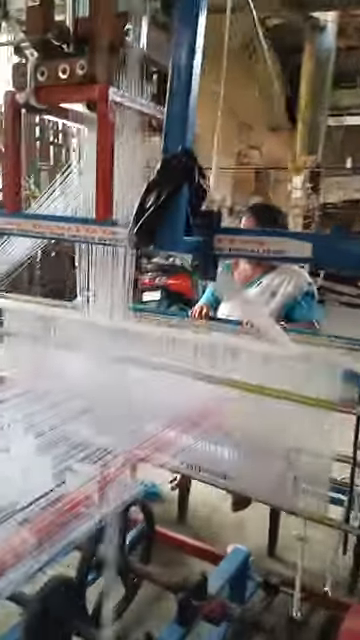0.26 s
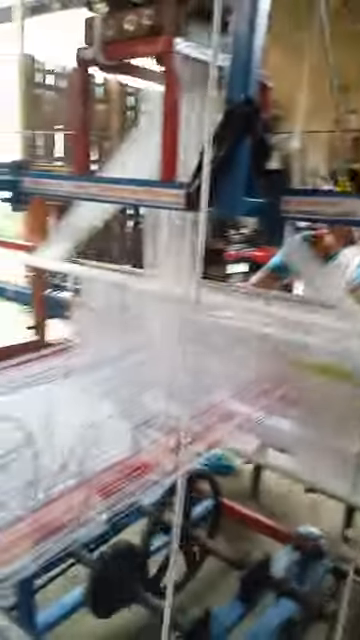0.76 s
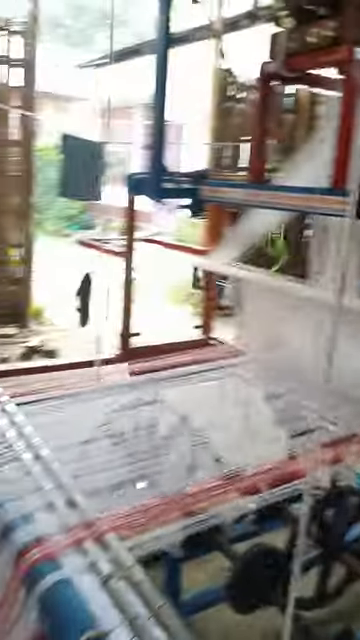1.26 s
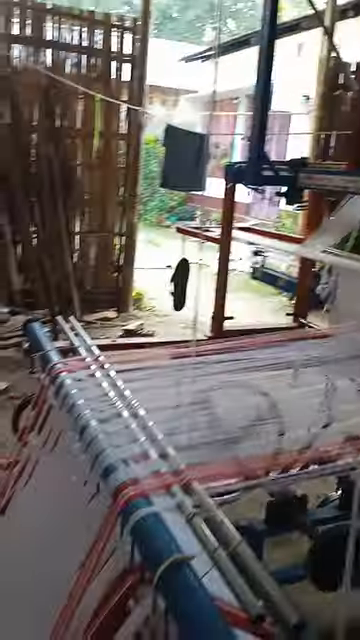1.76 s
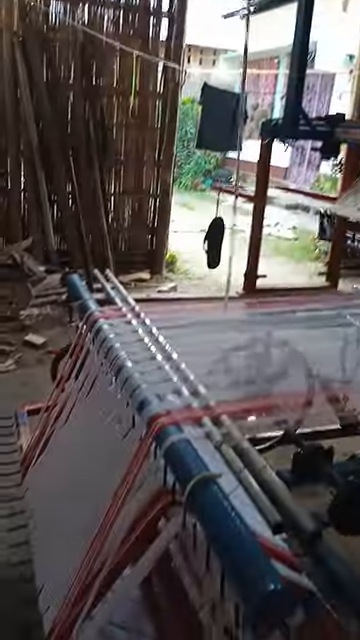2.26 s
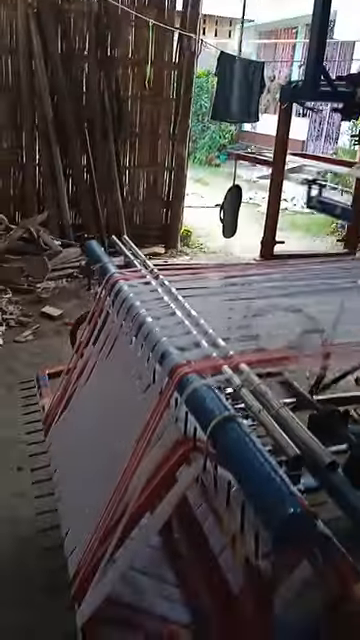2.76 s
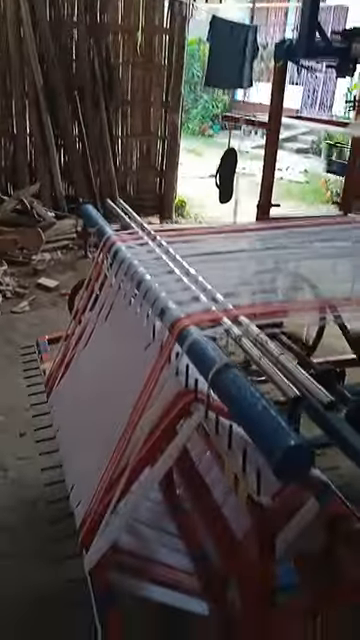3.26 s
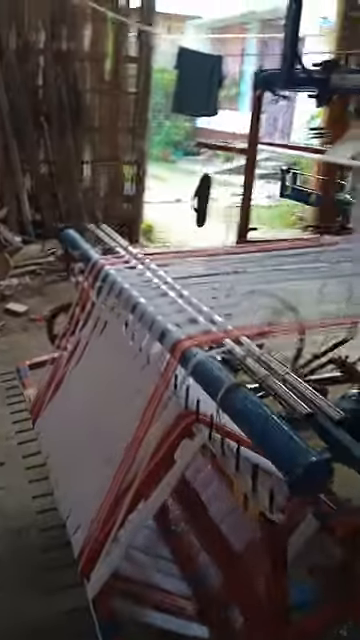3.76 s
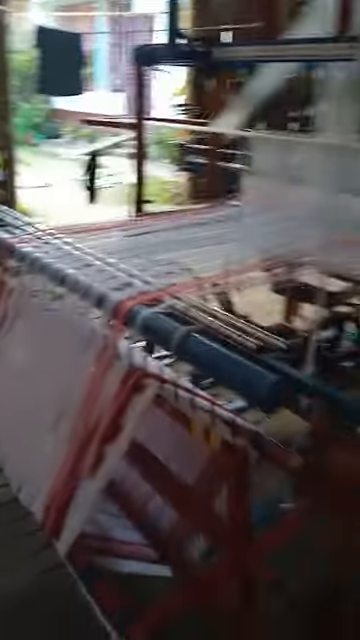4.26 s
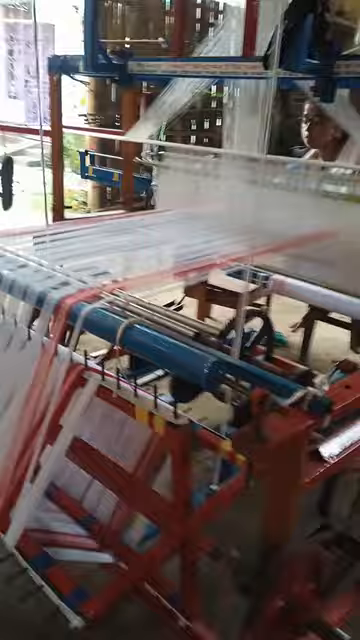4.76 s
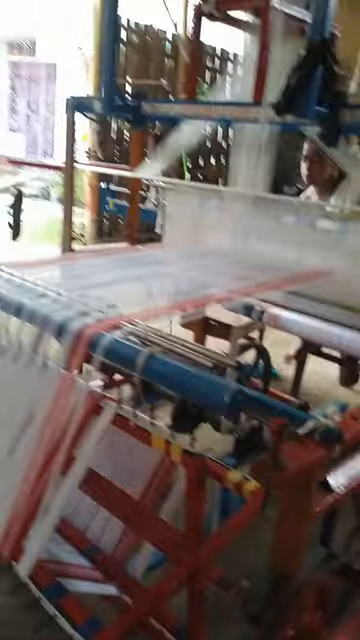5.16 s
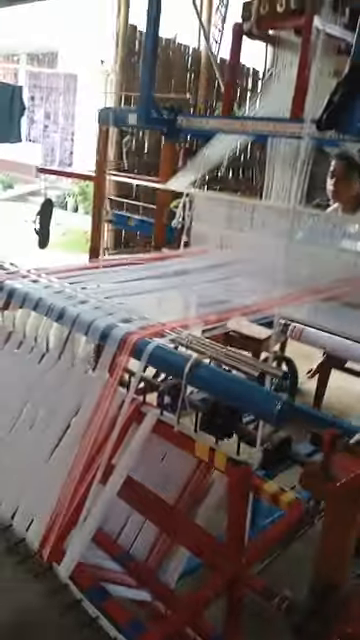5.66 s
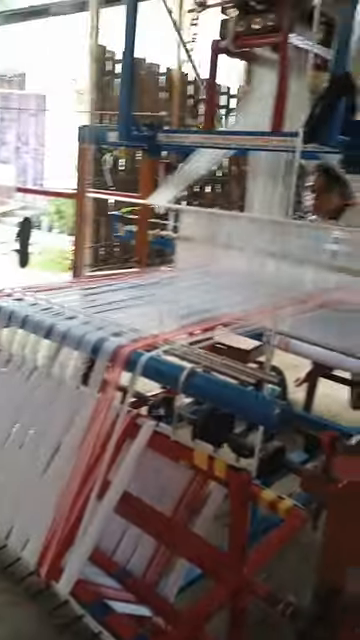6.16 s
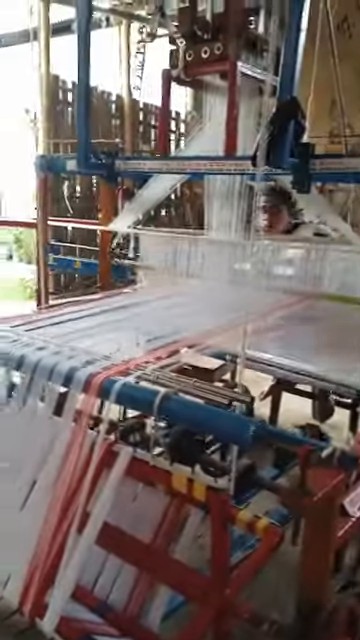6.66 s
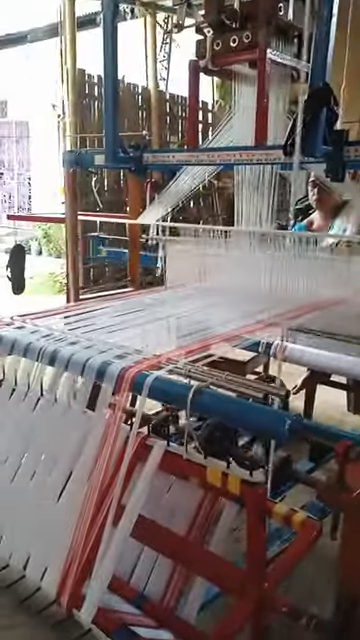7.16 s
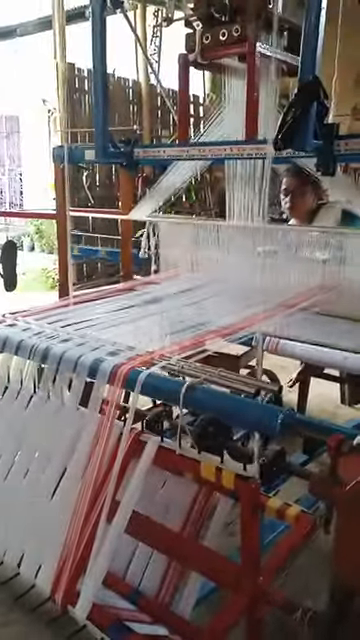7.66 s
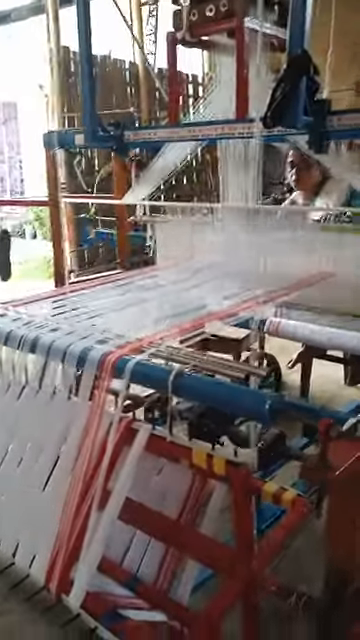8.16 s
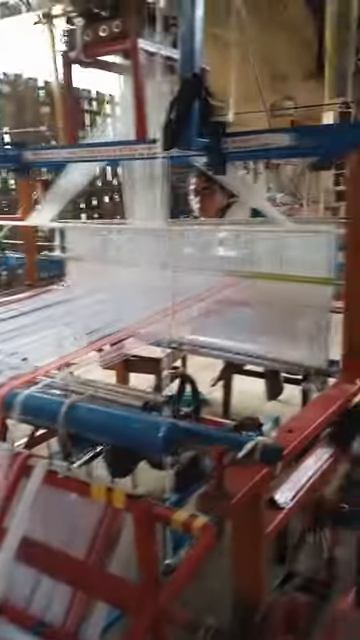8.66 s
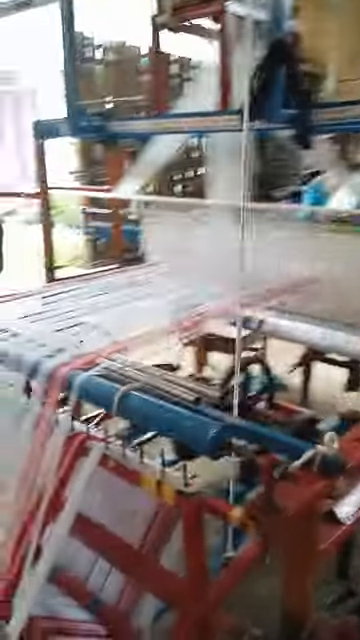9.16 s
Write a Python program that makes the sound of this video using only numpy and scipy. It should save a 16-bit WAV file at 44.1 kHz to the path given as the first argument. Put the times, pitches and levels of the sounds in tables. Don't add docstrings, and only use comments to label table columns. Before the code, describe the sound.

A steady, roughly one-second weaving cycle of bright metallic clatter, wooden knocks and jingling hooks, with blurred looms farther off.

```python
import sys
import numpy as np
from scipy import signal
from scipy.fft import rfft, irfft
from scipy.io import wavfile
from scipy.ndimage import uniform_filter1d, map_coordinates

SR = 44100
rng = np.random.default_rng(int(sys.argv[2]) if len(sys.argv) > 2 else 0)


def wrap_up_sound(samples):
    columns = np.atleast_2d(samples).T
    tamed = np.clip(columns, -1, 1)
    steps = np.round(tamed * 32767).astype(np.int16)
    wavfile.write(sys.argv[1], SR, steps)


def how_loud(loudness_db):
    steps = np.asarray(loudness_db, float) / 20
    return 10 ** steps


N = 414981

# frequency in Hz, level in dB per Hz.
WOOD = [(40, -70), (142, -36.5), (492, -12), (600, -13.5), (890, -10), (1370, -8.5), (1520, -8), (2300, -4),
        (3350, -13), (4500, -14), (5850, -31), (9900, -120)]
# frequency in Hz, level in dB per Hz.
STEEL = [(1760, -54), (3000, -5.5), (3370, -13), (4180, -8.5), (6400, 3.5), (7080, 1.5), (8300, -17),
         (9500, -25), (12400, -33), (20900, -120)]
# frequency in Hz, level in dB per Hz.
REED = [(5000, -28), (7800, 0), (9900, 0), (11500, -6), (12400, -6), (13600, -11), (14400, -13),
        (16000, -12)]
# start in seconds, end in seconds, jangle in dB.
LIFTS = [(0.26, 0.617, -14.5), (1.22, 1.583, -9.5), (2.208, 2.53, -11.5), (3.085, 3.523, -8),
         (4.126, 4.483, -13), (5.072, 5.517, -6), (6.15, 6.613, -9), (7.08, 7.297, -17),
         (7.422, 7.815, -5.5), (8.389, 8.83, -8)]
# start in seconds, steel peak in dB, wood share in dB.
PULLS = [(.387, -17.5, -3), (1.2288, -18.5, -18), (2.2435, -23.5, -13), (2.2857, -13.5, -9.5),
         (3.1666, -19.5, -10.5), (3.2, -18, -28), (4.202, -18.5, -8), (5.117, -20, -18), (6.225, -26, -2),
         (7.411, -24.5, -7.5), (8.468, -23, -5)]
# start in seconds, steel peak in dB, wood share in dB, length over the usual.
FALLS = [(.456, -11, -9.5, 1.06), (1.3886, -9.5, -13, 1.7), (2.386, -10, -14, 0.75),
         (2.4458, -10.5, -30, 0.74), (3.311, -9.5, -14, 1.3), (4.3405, -14, -13, 1.2),
         (5.2929, -10, -14, 1.1), (6.3895, -15, -9, 1.14), (7.5986, -13.5, -13, 0.78),
         (7.765, -20, -4.5, 0.49), (8.6343, -12, -9, 0.95)]
# start in seconds, steel peak in dB, wood share in dB.
BEATS = [(.6547, -9, -15), (1.641, -6.5, -24), (2.579, -8.5, -14.5), (2.62, -17, -15.5), (3.5683, -8, -32),
         (4.5154, -8.5, -21.5), (5.5724, -12, -23), (6.6563, -18, -10), (6.689, -17.5, -6.5),
         (7.834, -9, -19), (8.867, -11, -16)]
# start in seconds, steel peak in dB, wood share in dB, length over the usual.
THROWS = [(0, -18, -12.5, 1.2), (.0172, -12.5, -18.5, 0.76), (.9003, -10, -25, 0.91),
          (1.897, -25.5, -6.5, 1.2), (1.9108, -14, -20, 0.77), (2.828, -11.5, -18, 0.77),
          (3.819, -16.5, -17, 1), (3.833, -15, -25, 0.98), (4.735, -21.5, -5.5, 0.73),
          (4.7527, -9, -18.5, 0.92), (5.867, -19, -12.5, 1.65), (5.9998, -17.5, -10.5, 0.81),
          (8.0183, -18, -7, 0.66), (8.1094, -23.5, -8.5, 1.56), (9.116, -14, -23, 0.54)]
# start in seconds, steel peak in dB, wood share in dB.
STOPS = [(.1483, -10.5, -14), (1.0432, -13.5, -14), (2.041, -9, -13), (2.973, -14.5, -21),
         (3.9634, -10, -14.5), (4.8823, -15.5, -15.5), (6.0372, -16, -12), (8.248, -14, -8),
         (9.2575, -22, -12.5)]
# start in seconds, steel peak in dB, wood share in dB.
KNOCKS = [(.772, -29.5, 0.5), (1.3494, -18, -1), (2.696, -21.5, -4), (3.255, -29, -7), (3.6855, -29, -1.5),
          (4.3161, -16.5, -8.5), (4.6328, -27.5, -1.5), (5.229, -23, -3.5), (5.693, -27.5, 0.5),
          (6.273, -28.5, 4.5), (6.7695, -33.5, 5.5), (7.223, -42, 0), (7.528, -29, 3.5), (7.9594, -35, -2),
          (8.1977, -28, -7), (8.578, -21, -0.5), (8.7426, -11, -10), (8.9738, -13.5, -9)]
# start in seconds, steel peak in dB, wood share in dB.
TICKS = [(.0747, -20, -9.5), (.8335, -25, -8.5), (1.9719, -18.5, -18.5), (2.0118, -18.5, -17),
         (2.2144, -26, -52), (2.9457, -25, -5), (3.1043, -23, -40), (3.311, -14.5, -10),
         (1.9118, -16, -13.5), (1.228, -20, -7.5), (.147, -14.5, -12), (9.1177, -16.5, -22),
         (5.5724, -18, -12.5), (3.8197, -22, -15), (3.895, -19, -16), (4.715, -28, -6), (5.04, -32, -18),
         (.886, -26, -22), (2.812, -22.5, -17), (5.062, -33.5, 1.5), (4.163, -28, -26), (8.4807, -23, -9),
         (5.089, -25, -11), (5.9304, -21, -10.5), (7.0189, -25, -18), (7.2944, -30.5, -11),
         (7.3444, -35, -6), (8.405, -26, -9), (9.3935, -32, -35)]
# start in seconds, steel peak in dB, wood
# share in dB.
RATTLES = [(.185, -21, -8), (.366, -36, 0), (.572, -18.5, -16), (.695, -20, -7), (1.054, -14, -19),
           (1.263, -18, -22), (1.403, -14, -15), (2.082, -12.5, -8.5), (3.272, -30, 4), (2.735, -25, -25),
           (8.31, -22, -7), (2.962, -19, -25), (3.44, -11.5, -17), (3.562, -25, -14), (3.848, -20, -16),
           (4.015, -16.5, -10), (4.252, -14.5, -15), (4.905, -13, -23), (5.288, -17, -7), (5.388, -16, -16),
           (5.418, -18, -23), (5.703, -25.5, -2.5), (5.765, -29.5, -20), (6.41, -22, -2), (6.4, -19, -20),
           (7.518, -24, -26), (7.548, -30, 4), (7.69, -14.5, -11), (8.036, -26, -18), (8.246, -20, -16),
           (8.415, -36, -23), (8.556, -23, -12), (8.645, -14.5, -7), (8.705, -16, -11), (9.105, -28, -15)]
# its blows, reed share in dB, shower decay (t60) in seconds,
# after-shake of the hooks in dB, after-shake of the frame in dB, first crack in dB.
BLOWS = [
    (PULLS, -19.5, 0.45, -19.5, -15, -1.5),
    (FALLS, -19.5, 0.47, -38, -43, -2.5),
    (BEATS, -19.5, 0.25, -19, -23.5, -2.4),
    (THROWS, -22, 0.31, -21.5, -23, -2.3),
    (STOPS, -19.5, 0.3, -24, -25, -1.8),
    (KNOCKS, -40.5, 0.16, -26, -21, -7),
    (TICKS, -25, 0.3, -30, -24.5, -0.96),
    (RATTLES, -21.5, 0.18, -24, -43, -10),
]


def unit(x):
    return x / np.sqrt(np.mean(x ** 2) + 1e-20)


def along(points, hz):
    f, v = np.transpose(points)
    return np.interp(np.log(hz + 1), np.log(f + 1), v)


def wobble(rate):
    steps = np.arange(0, N + 16, 16)
    knots = rng.standard_normal(int(N * rate / SR) + 4)
    return np.interp(np.arange(N), steps, map_coordinates(knots, [steps * rate / SR]))


def coloured(x, spectrum):
    size = 4096
    cepstrum = irfft(np.log(how_loud(along(spectrum, np.fft.rfftfreq(size, 1 / SR))) + 1e-6))
    cepstrum[1:size // 2] *= 2
    cepstrum[size // 2 + 1:] = 0
    response = irfft(np.exp(rfft(cepstrum)))
    return signal.oaconvolve(x, response / np.linalg.norm(response))[:N]


def contacts(rate, patchy_db):
    lumps = how_loud(2.2 * np.clip(wobble(rate), -2, 2))
    z = signal.stft(rng.standard_normal(N) * lumps, nperseg=256)[2]
    for bins, frames in ((2, 6), (9, 18)):
        field = uniform_filter1d(rng.standard_normal(z.shape), bins, 0)
        field = uniform_filter1d(field, frames, 1)
        z = z * how_loud(patchy_db * np.clip(unit(field), -2.5, 2.5))
    return unit(signal.istft(z, nperseg=256)[1][:N])


def ringing(modes, drive, rate, lumpy_db, fickle_db):
    out = np.zeros(N)
    for hz, width_hz, db in modes:
        radius = np.exp(-np.pi * max(width_hz, 34) / SR)
        turn = 2 * np.pi * hz / SR
        power_gain = np.sqrt(1 - radius ** 2) * 2 * np.sin(turn)
        level_db = lumpy_db * wobble(rate) + fickle_db * np.clip(wobble(11), -2.5, 1.3)
        strikes = drive * unit(rng.standard_normal(N) * how_loud(level_db))
        resonator = [1, -2 * radius * np.cos(turn), radius ** 2]
        out += how_loud(db) * power_gain * signal.lfilter([1], resonator, strikes)
    return out / np.linalg.norm(how_loud(np.transpose(modes)[2]))


def showers(stretch):
    crack_t60, build_up = 0.026, 0.034
    power, t = np.zeros((3, N + SR)), np.arange(SR // 3) / SR
    crack = how_loud(-60 * t / crack_t60)
    for rows, reed_db, usual_t60, _, _, crack_db in BLOWS:
        for s, db, wood_db, *length in rows:
            t60 = max(usual_t60 * np.prod(length), .02)
            build = 1 - np.exp(-t / (build_up * t60 ** 2))
            shower = how_loud(-60 * t / (t60 * np.c_[stretch])) * build
            level = how_loud(2 * (db + np.c_[[0, wood_db, reed_db]]))
            power[:, round(s * SR):][:, :len(t)] += level * (shower ** 2 + (how_loud(crack_db) * crack) ** 2)
    return np.sqrt(power[:, :N])


def late_body(x, strength):
    body_hz, lag_s = 1050, 0.02
    keep = np.exp(-1 / (SR * lag_s))
    moving = signal.lfilter([1 - keep], [1, -keep], strength) / (strength + 1e-9)
    low = signal.sosfiltfilt(signal.butter(2, body_hz, fs=SR, output="sos"), x)
    return x - (1 - np.clip(moving, 0, 1)) * low


def struck_materials(steel, wood, reed):
    # frequency in Hz, level in dB.
    batten = [(150, -31), (600, -7), (1300, -1), (3000, 0.5), (4500, -1)]
    out = how_loud(-11.0) * coloured(steel * contacts(300, patchy_db=1.2), STEEL)
    wooden = coloured(wood * contacts(200, patchy_db=1.0), WOOD)
    out += how_loud(-4.0) * late_body(coloured(wooden, batten), wood)
    return out + how_loud(0.5) * coloured(reed * contacts(300, patchy_db=2), REED)


def shaking():
    # peak in seconds, hooks in dB, frame in dB,
    # settling time over the usual.
    swells = [(.5, -20.5, -27.5, 0.67), (1.431, -21.5, -26, 1.47), (2.42, -24, -28, 0.99),
              (3.35, -23, -24, 1.4), (4.35, -20.5, -22.5, 1.07), (5.428, -24.5, -22, 0.47),
              (6.43, -32.5, -28.5, 1.23), (7.632, -24, -22, 1.35), (8.67, -26.5, -23.5, 1.46)]
    rise_db_per_s, fall_db_per_s = [135, 107], [54, 82]
    swell_lead_s = 0.11
    after_s, after_rise_db_per_s, after_fall_db_per_s = 0.031, 301, [61, 71.5]
    power, t = np.full((2, N + 2 * SR), 1e-7), np.arange(-SR // 2, SR // 2) / SR
    rise = np.minimum(np.c_[rise_db_per_s] * t, after_rise_db_per_s * (t + swell_lead_s))
    after = how_loud(2 * np.minimum(after_rise_db_per_s * t, -np.c_[after_fall_db_per_s] * t))
    peaks = []
    for s, hooks_db, frame_db, settle in swells:
        fall = -np.c_[fall_db_per_s] * t / settle
        peaks.append((s, hooks_db, frame_db, how_loud(2 * np.minimum(rise, fall))))
    for rows, _, _, hooks_db, frame_db, _ in BLOWS:
        for s, db, *_ in rows:
            peaks.append((s + after_s, db + hooks_db, db + frame_db, after))
    for s, hooks_db, frame_db, shape in peaks:
        power[:, round(s * SR):][:, :len(t)] += how_loud(2 * np.c_[[hooks_db, frame_db]]) * shape
    return np.sqrt(power[:, SR // 2:][:, :N])


def rustle(hooks, frame):
    out = how_loud(-12) * coloured(hooks * contacts(300, patchy_db=4.0), STEEL)
    hard_shake = hooks * (hooks / how_loud(-20.0)) ** 0.27
    out += how_loud(-14.5) * coloured(hard_shake * contacts(300, patchy_db=5), REED)
    return out + how_loud(-8.5) * coloured(frame * contacts(200, patchy_db=3.5), WOOD)


def jangle(hooks, steel):
    # frequency in Hz, width in Hz, level in dB.
    hook_modes = [(3790, 42, -5.5), (3900, 70, -12), (4540, 51, -2), (5150, 170, -1), (5640, 43, 2.5),
                  (5840, 45, -2.5), (6300, 50, -2), (6470, 37, 0.5), (6890, 60, -9), (7727, 40, -6.5),
                  (8000, 35, -13), (9120, 60, -10.5), (9920, 60, -10), (12200, 49, -16.5)]
    now = np.arange(N) / SR
    swing = sum(how_loud(db) * (now > a) * (now < b) for a, b, db in LIFTS)
    free = how_loud(-22) + uniform_filter1d(swing, size=1500)
    drive = free * (hooks + how_loud(-13.5) * steel)
    return how_loud(-1.0) * ringing(hook_modes, drive, 120, lumpy_db=2.5, fickle_db=3.5)


def frame_bars(frame, wood):
    # frequency in Hz, width in Hz, level in dB.
    bar_modes = [(595, 103, -14.5), (1335, 44, -6), (1425, 43, -8), (1658, 39, -3.5), (1853, 35, -5),
                 (2069, 54, -2.5), (2132, 33, -2.5), (2229, 40, -3), (2271, 42, -2), (2367, 40, -2.5),
                 (2680, 170, -6.5), (2915, 87, -6), (3580, 77, -13)]
    drive = how_loud(-13.5) * frame + how_loud(-9.5) * wood
    return ringing(bar_modes, drive, 90, lumpy_db=4.5, fickle_db=5.5)


def pings(strengths):
    # middle frequency in Hz, spread of log pitch, level in dB.
    kinds = [(2147, .3, -8.5), (5800, 0.21, -10.5), (10100, 0.14, -27)]
    per_s, t60, rise_s, range_db = 230, 0.12, 0.0014, 15.5
    out, k = np.zeros(N), np.arange(1350)
    fade = np.cos(np.pi / 2 * k / len(k))
    shape = how_loud(-60 * k / SR / t60) * (1 - np.exp(-k / SR / rise_s)) * fade
    for (middle_hz, spread, db), strength in zip(kinds, strengths):
        u = rng.random((int(N / SR * per_s), 3))
        start = (u[:, :1] * (N - 1)).astype(int)
        hz = middle_hz * np.exp(spread * 3.4 * (u[:, 1:2] - .5))
        level = how_loud(range_db * (u[:, 2:] - 1.0)) * strength[start]
        grains = level * np.sin(2 * np.pi * hz * k / SR) * shape
        out += how_loud(db) * np.bincount((start + k).ravel(), grains.ravel(), N + len(k))[:N]
    return out


def rings():
    # start in seconds, level in dB, frequency in Hz, length in seconds.
    bar_rings = [(0.188, -30, 2382, 0.055), (2.659, -31.5, 2264, 0.14), (3.322, -23.5, 2288, 0.13),
                 (4.044, -35.5, 2379, 0.04), (4.201, -25, 2363, 0.087), (5.309, -27.5, 2227, 0.072),
                 (6.046, -34, 1860, 0.082), (6.861, -49.5, 1335, 0.08), (6.883, -50, 2070, 0.12),
                 (8.29, -38, 1293, 0.064), (2.028, -33, 2940, 0.046), (0.379, -25, 2360, .07),
                 (.38, -28, 2870, .05), (0.449, -30, 2302, .07), (6.677, -36, 2240, 0.025),
                 (1.341, -28, 2870, .03), (3.634, -37.5, 2260, 0.085), (3.837, -30.5, 2360, 0.054),
                 (3.998, -40, 1249, 0.055), (6.05, -37.5, 3531, 0.065), (6.21, -42, 2907, .05),
                 (6.215, -39, 3531, 0.046), (7.01, -44, 1873, 0.056), (8.25, -35, 2239, .05),
                 (8.472, -32, 1414, 0.038), (8.654, -24.5, 2240, 0.069), (8.874, -33.5, 1335, 0.046),
                 (8.973, -25.5, 2062, 0.058)]
    # start in seconds, level in dB, frequency in Hz.
    hook_rings = [(0, -31, 4900), (1.231, -39, 7727), (1.236, -32.5, 4540), (1.257, -33, 6480),
                  (1.512, -37, 8000), (2.211, -38.5, 3790), (2.225, -44, 4420), (2.229, -28.5, 6450),
                  (2.435, -23, 6450), (3.164, -33, 7713), (3.19, -35, 4490), (3.242, -33, 7100),
                  (3.431, -27, 5630), (3.454, -38, 7850), (4.148, -38, 7830), (4.418, -25, 5630),
                  (5.102, -36, 4500), (5.38, -33, 7715), (5.849, -34.5, 4900), (6.376, -35, 12400),
                  (6.543, -45, 11039), (7.683, -29, 5550), (7.941, -42, 5600), (9.19, -44, 7731),
                  (.005, -49, 9238), (.395, -30, 7700), (.535, -31, 7700), (.575, -36, 4565),
                  (1.225, -41, 12300), (1.405, -40, 9905), (1.455, -33, 4544), (1.475, -42, 12274),
                  (1.49, -40, 9905), (1.495, -39, 8915), (2.2, -48, 9152), (2.395, -37, 12240),
                  (2.425, -27, 5700), (3.195, -43, 9087), (3.3, -25.5, 3970), (4.305, -29.5, 9884),
                  (4.395, -23.5, 6438), (5.095, -46, 10745), (5.105, -47, 9496), (5.115, -45, 7800),
                  (5.135, -36, 5600), (5.375, -28, 6481), (5.395, -36, 12200), (5.985, -42, 4130),
                  (6.15, -43, 7106), (6.155, -44, 6600), (6.48, -40, 8060), (6.543, -43, 12274),
                  (7.085, -47, 4560), (7.26, -46, 5680), (7.474, -40, 4580), (7.665, -36, 12274),
                  (8.395, -34, 5620)]
    out, drift = np.zeros(N + SR), 1.5 * wobble(80)
    parts = bar_rings + [(*row, 0.06) for row in hook_rings]
    parts = parts + [(s, db - 33, 5640, 0.05) for s, _, db in LIFTS]
    for s, db, hz, length in parts:
        start, t = round((s + .012) * SR), np.arange(round(2 * length * SR)) / SR
        swell = (1 - np.exp(-t / 0.0015)) * how_loud(-14 * (t / length) ** 1.9)
        tone = np.sin(2 * np.pi * hz * t + np.resize(drift[start:], len(t)))
        out[start:][:len(t)] += how_loud(db + 2.0 - 0.00019 * hz) * swell * tone
    return out[:N] * how_loud(4 * np.clip(wobble(110), -2.5, 1.2))


def yard():
    # frequency in Hz, level in dB per Hz.
    far_spectrum = [(40, -16), (130, -16), (350, -15), (2200, -8), (3800, -13.5), (6400, -15.5),
                    (9000, -29), (16000, -35)]
    level = how_loud(-53 + 2 * wobble(6))
    return level * coloured(contacts(60, patchy_db=0.5), far_spectrum)


def shed(x):
    # frequency in Hz, decay (t60) in seconds.
    decay = [(300, 0.52), (2000, 0.18), (5500, 0.096), (14000, 0.14)]
    out, hop = np.zeros(N + 2 * SR), SR // 4
    for start in range(0, N, hop):
        hz, t, z = signal.stft(rng.standard_normal(SR // 2), SR, nperseg=256)
        fading = how_loud(-60 * t / along(decay, hz)[:, None])
        tail = signal.istft(z * fading, SR, nperseg=256)[1]
        piece = x[start:start + 2 * hop] * np.hanning(2 * hop)[:N - start]
        wet = signal.fftconvolve(piece, tail / np.linalg.norm(tail))
        out[start + 300:][:len(wet)] += wet
    return out[:N]


def snaps():
    # start in seconds, peak in dB.
    bursts = [(0.157, -17), (0.392, -27), (0.4703, -24), (0.4968, -22), (0.5676, -32), (0.6534, -31),
              (0.9073, -29), (1.043, -26), (1.3862, -22), (1.6447, -15), (2.0393, -16), (2.385, -21),
              (2.5825, -34), (2.8295, -27), (2.9736, -30), (3.3139, -33), (3.5713, -16), (3.9644, -18),
              (4.3201, -22), (4.5191, -32), (4.7566, -30), (4.8838, -25), (5.1078, -31), (5.2769, -32),
              (5.3892, -22), (5.5732, -22), (5.9998, -24), (6.0392, -28), (6.2292, -32), (6.3694, -35),
              (6.3899, -22), (6.5046, -21), (6.5555, -33), (6.6528, -32), (6.6877, -33), (7.42, -41),
              (7.5188, -34), (7.5882, -24), (7.8351, -24), (8.0187, -41), (8.2516, -27), (8.4786, -35),
              (8.8692, -32), (8.975, -27), (9.1177, -30), (9.2594, -32)]
    # frequency in Hz, level in dB per Hz.
    fine = [(11500, -44), (13600, -12), (14500, -1), (15300, 5), (16000, 0)]
    level_db, t60, rise_s = -8, 0.23, 0.0018
    power, t = np.zeros(N + SR), np.arange(SR // 3) / SR
    shape = how_loud(-60 * t / t60) * (1 - np.exp(-t / rise_s))
    for s, db in bursts:
        power[round(s * SR):][:len(t)] += (how_loud(db + level_db) * shape) ** 2
    return coloured(np.sqrt(power[:N]) * contacts(250, patchy_db=-1), fine)


def lever():
    # frequency in Hz, level in dB, decay (t60) in seconds.
    lever_modes = [(1755, 1.5, 0.11), (2070, 0, 0.18), (2363, 1, 0.24), (2690, -3, 0.19), (2860, -7, .14),
                   (3270, -4, 0.092), (3510, -14, .12)]
    out, t = np.zeros(N + SR), np.arange(SR // 5) / SR
    hz, level_db, t60 = np.transpose(lever_modes)[:, :, None]
    chances = rng.standard_normal((len(PULLS), 2, len(lever_modes), 1))
    for (s, db, wood_db), (level_chance, phase_chance) in zip(PULLS, chances):
        decay = how_loud(level_db + 3.1 * level_chance - 60 * t / t60)
        modes = decay * np.sin(2 * np.pi * hz * t + 2 * phase_chance)
        soft_start = 1 - np.exp(-t / 0.004)
        out[round(s * SR):][:len(t)] += how_loud(db + wood_db - 6) * modes.sum(axis=0) * soft_start
    return out[:N]


def looms():
    steel, wood, reed = showers(stretch=[1.01, 1.1, .85])
    hooks, frame = shaking()
    out = struck_materials(steel, wood, reed) + rustle(hooks, frame)
    out += jangle(hooks, steel) + frame_bars(frame, wood) + lever()
    bar_touch = frame + how_loud(-7) * wood
    hook_touch = hooks + how_loud(-17) * steel
    return out + pings([bar_touch, hook_touch, hook_touch])


def clacks():
    # start in seconds, peak in dB, pitch of the struck bar in Hz.
    hits = [(.388, -20, 2500), (1.228, -20, 2500), (1.353, -26, 2690), (2.6954, -22, 2260),
            (3.3116, -15, 2100), (4.2026, -21, 1960), (4.5165, -19, 2700), (4.745, -20, 2620),
            (5.573, -21, 2210), (6.6884, -19, 2270), (7.8337, -21, 3900), (8.9747, -15, 3800),
            (9.1187, -21, 5200)]
    t60, plate_hz, plate_db = 0.046, 6830, -2.5
    out, t = np.zeros(N + SR), np.arange(SR // 20) / SR
    for (s, db, hz), u in zip(hits, rng.standard_normal((len(hits), 2, 4, 1))):
        bar = np.sin(2 * np.pi * hz * (1 + 0.071 * u[0]) * t).sum(axis=0)
        plate = how_loud(plate_db) * np.sin(2 * np.pi * plate_hz * (1 + 0.059 * u[1]) * t).sum(axis=0)
        shape = how_loud(db - 5 - 60 * t / t60) * (1 - np.exp(-t / .0008))
        out[round(s * SR):][:len(t)] += shape * (bar + plate)
    return out[:N]


def treadles():
    # start in seconds, level in dB.
    thuds = [(.47, -40), (2.385, -40), (2.96, -47.5), (3.03, -44.5), (3.685, -41.5), (4.34, -40),
             (4.63, -42), (4.885, -43), (5.075, -38.5), (5.225, -44), (5.29, -38), (5.875, -46.5),
             (6.28, -54), (6.385, -37.5), (6.66, -44), (7.3, -48.5), (7.345, -47), (7.6, -38.5),
             (8.64, -43), (9.258, -46)]
    # frequency in Hz, level in dB per Hz.
    boards = [(120, -15.5), (250, -8.5), (550, 2.5), (1100, -20)]
    push, t = np.zeros(N + SR), np.arange(SR // 2) / SR
    for s, db in thuds:
        push[round(s * SR):][:len(t)] += how_loud(db - 60 * t / 0.3) * (1 - np.exp(-t / 0.0022))
    return coloured(push[:N] * rng.standard_normal(N), boards)


def taps():
    # start in seconds, peak in dB, rebound in Hz.
    touches = [
        (3.772, -34, 179),
        (4.031, -51, 200),
        (8.406, -27.5, 210),
        (8.52, -8, 600),
    ]
    out, t = np.zeros(N), np.arange(SR // 40) / SR
    for s, db, hz in touches:
        push = np.exp(-((5 * hz * t - 1.2) / 0.39) ** 2)
        swing = .5 * np.sin(2 * np.pi * hz * t - 1.4) * np.exp(-2.2 * hz * t)
        rebound = swing * (1 - np.exp(-(4 * hz * t) ** 4))
        out[round(s * SR):][:len(t)] += how_loud(db) * (rebound - push)
    return out


def scene():
    near = looms() + treadles() + rings() + snaps() + clacks()
    mix = near + how_loud(-8.5) * shed(near) + taps() + yard()
    return np.tile(mix, (2, 1))


def band_limit(x):
    return signal.sosfilt(signal.butter(12, 17010, fs=SR, output="sos"), x)


def record(dry):
    # time in seconds, upper treble in dB, lower treble in dB.
    aim = [(0, -1.5, -0.5), (1, 3, 3), (1.9, -2, -3), (2.75, -1.5, 4), (3.602, -1, 1.5), (4.4, -0.5, -0.5),
           (5.3, 7, -2), (6.3, 7, -3.5), (6.8, 5.5, -3.5), (7.3, 8.5, -0.5), (8, 6, -10.5), (8.7, 9, -12),
           (9.05, 0, 1.5), (9.4, 4.5, 5.5)]
    ceiling, low_hz, top_hz = .43, 88, 15870
    treble = signal.sosfiltfilt(signal.butter(4, 7700, "high", fs=SR, output="sos"), dry[:1])
    upper = signal.sosfiltfilt(signal.butter(4, 11500, "high", fs=SR, output="sos"), dry[:1])
    now = np.arange(N) / SR
    s, upper_db, lower_db = np.transpose(aim)
    upper_gain = how_loud(np.interp(now, s, upper_db))
    lower_gain = how_loud(np.interp(now, s, lower_db))
    x = dry - treble + upper_gain * upper + lower_gain * (treble - upper)
    x = x / (1 + abs(x / ceiling) ** 4) ** (1 / 4)
    x = signal.sosfilt(signal.butter(3, low_hz, "high", fs=SR, output="sos"), x)
    x = irfft(rfft(x) * (np.fft.rfftfreq(N, 1 / SR) < top_hz), N)
    return band_limit(x)


dry = scene()
out = record(dry)
wrap_up_sound(out)
```